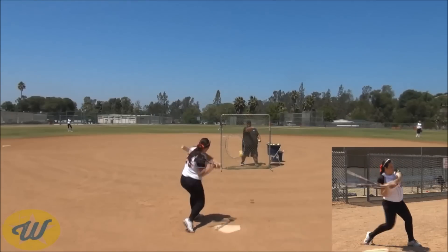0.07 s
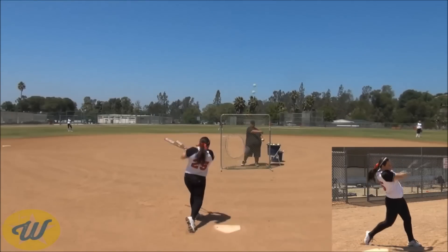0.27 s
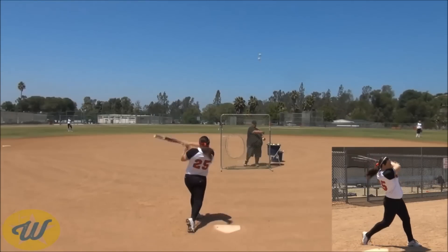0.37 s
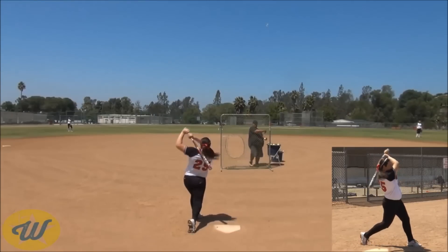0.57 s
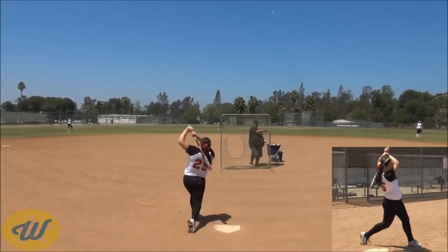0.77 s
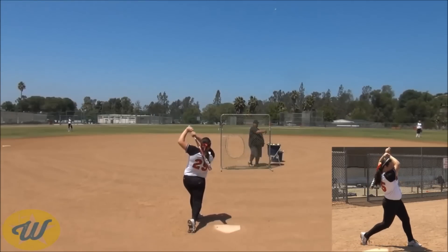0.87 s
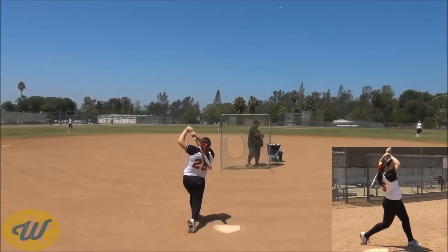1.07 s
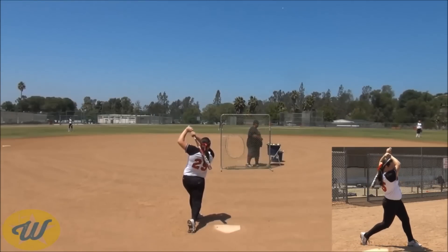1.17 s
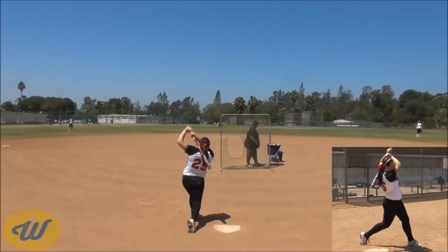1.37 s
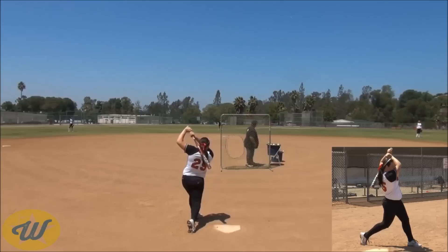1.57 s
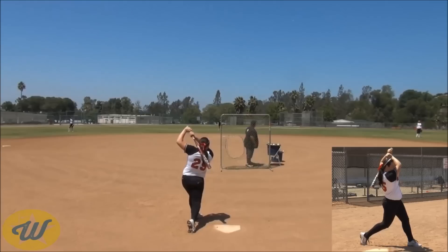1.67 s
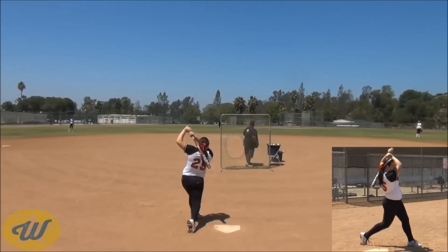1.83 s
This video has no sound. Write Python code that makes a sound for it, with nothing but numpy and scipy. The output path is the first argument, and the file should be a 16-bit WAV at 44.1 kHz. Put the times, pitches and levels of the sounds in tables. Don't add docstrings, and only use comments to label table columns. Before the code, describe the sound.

A bat cracks a softball once, sharp and overloaded, with echoes across an open field

```python
import sys
import numpy as np
from scipy import signal
from scipy.fft import rfft, irfft
from scipy.io import wavfile
from scipy.ndimage import uniform_filter1d

SR = 44100
rng = np.random.default_rng(int(sys.argv[2]) if len(sys.argv) > 2 else 0)


def field_ratio(decibels):
    return 10 ** (np.asarray(decibels, dtype=float) / 20)


def transcribe(signal):
    frames = np.atleast_2d(signal).T
    limited = np.clip(frames, -1, 1)
    pcm = np.round(limited * 32767).astype(np.int16)
    wavfile.write(sys.argv[1], SR, pcm)


N = 83790
HIT_S = 0.23717


def bat():
    # pitch_hz, level_db, t60_s
    modes_left = [(756, -12.8, .027), (1044, 19.9, .004), (1627, 26.1, .0023), (2279, 22.1, .0029),
                  (3448, 13.3, .002), (3420, -17, .015), (3790, -14, .016), (5630, -24, .006),
                  (9250, -14, .005)]
    # pitch_hz, level_db, t60_s
    modes_right = [(700, -14, .035), (960, 4.9, .0068), (1433, 14.7, .0027), (2085, 2.7, .0047),
                   (4137, -2.5, .0023), (6666, 5.5, .0016), (7600, 10.5, .0017), (8118, 4.9, .002)]
    # delay_s, gain (linear)
    bounces_left = [
        (.001435, .41),
        (.00538, .045),
    ]
    # delay_s, gain (linear)
    bounces_right = [
        (.00139, .14),
        (.0032, .025),
    ]
    right_lag_s = 0.0002
    right_hit_s = HIT_S + right_lag_s
    out, t = np.zeros((2, N)), np.arange(3000) / SR

    crack_left = -struck(modes_left, bounces_left, 0)
    crack_right = struck(modes_right, bounces_right, right_lag_s)
    add(out, HIT_S, np.array([crack_left, crack_right]))

    touch = decay(t, -14, 0.0006) * np.sin(2 * np.pi * 4360 * t)
    add(out[0], HIT_S - 0.00028, touch)
    add(out[1], right_hit_s - 0.0001, -field_ratio(-22.5) * touch)
    ping = decay(t, 0, 0.0022) * np.sin(2 * np.pi * 11000 * t)
    add(out[1], right_hit_s - 0.00002, -ping)

    noise = bright(rng.standard_normal((2, len(t))), 600)
    rattle = evened(dull(noise, 3900) + 0.074 * noise) * decay(t, -16, 0.032)
    onset = np.minimum(t / 0.0006, 1)
    add(out, HIT_S + 0.0026, onset * rattle * field_ratio([[0], [-12]]))
    fizz_fade = np.sqrt(np.clip(1 - t / 0.0105, 0, 1))
    add(out, HIT_S + 0.001, field_ratio(-30) * evened(bright(noise, 6500)) * fizz_fade)
    thump = np.hanning(round(0.0034 * SR))
    add(out[0], HIT_S + 0.0018, -field_ratio(-25) * thump)
    return out


def struck(modes, bounces, lag_s):
    contact_s = 0.0006
    out = 0
    for delay_s, gain in [(0.000015, 0.72)] + bounces:
        t = np.maximum(np.arange(3000) / SR - lag_s - delay_s, 0)
        ring = sum(decay(t, db, t60) * np.sin(2 * np.pi * hz * t) for hz, db, t60 in modes)
        out = out + gain * ring * np.minimum(t / contact_s, 1)
    return out


def echoes():
    # start_s, peak_db, colour_hz, edge_db (bright edge)
    returns = [(0.258, -36, 869.2, -49), (0.263, -27.5, 756, -50), (0.276, -30, 1170, -39),
               (0.3, -38, 1070, -56), (0.336, -44, 1900, -44), (0.3435, -30.5, 2340, -58),
               (0.3551, -26, 1000, -52), (0.363, -38, 2700, -60), (0.3865, -31, 2170, -47),
               (0.4211, -30, 2100, -44.5), (0.451, -34, 2360, -47), (0.4531, -29, 2620, -47),
               (0.4595, -33, 2200, -58), (0.5165, -35, 1900, -52), (0.5185, -34, 915, -58),
               (0.571, -35.5, 1945, -60), (0.593, -37, 1820, -55), (0.623, -31.5, 1670, -58)]
    return pocks(returns)


def field():
    # pitch_hz, t60_s
    far_decay = [(300, 0.17), (700, 0.37), (1500, 0.66), (3000, 1), (6000, 0.92), (12000, 0.87)]
    # pitch_hz, level_db (per Hz)
    scatter_tone = [(180, -71), (300, -40), (484, -10), (1070, 4), (1350, -6.5), (2790, -6.5),
                    (4280, -18.5), (11700, -32), (15500, -49)]
    x = coloured(rng.standard_normal((2, N)), scatter_tone)
    hz, t, bands = signal.stft(x, SR, nperseg=256)
    band_t60 = read(far_decay, hz)[:, None]
    far = signal.istft(bands * decay(t, 0, band_t60), SR, nperseg=256)[1][:, :N]
    near = x[::-1, ::-1] * decay(np.arange(N) / SR, -33.5, 0.23)
    out = np.zeros((2, N))
    add(out, HIT_S + 0.008, paired(near + field_ratio(-35.5) * far, -0.03, -3))
    return out


def cleats():
    # time_s, level_db
    scrape = [(0, -50), (.05, -47.5), (.11, -49.5), (.15, -46.5), (.21, -50.5), (.35, -49.5), (.45, -47),
              (.5, -49), (.53, -50), (.63, -52.5), (.67, -57.5), (1.1, -60), (1.18, -62), (1.33, -59.5),
              (1.39, -54.5), (1.49, -50.5), (1.56, -59.5), (1.84, -61.5), (1.9, -51.5)]
    # pitch_hz, level_db (per Hz)
    dirt = [(240, -26), (400, -7), (442, -6), (613, -6.5), (887, -4.5), (3430, -12), (6510, -27.5),
            (12000, -41.5), (15600, -57), (22000, -120)]
    grains_per_s, spread_db = 2500, 2.5
    size = field_ratio(spread_db * np.minimum(rng.exponential(1, (2, N)), 4))
    falls = rng.random((2, N)) < grains_per_s / SR
    grit = size * falls * rng.choice([-1., 1.], (2, N))
    x = coloured(grit / grit.std() + 0.52 * rng.standard_normal((2, N)), dirt)
    return 1.51 * level(scrape) * paired(x, 0.0418, -7.5)


def stones():
    # start_s, peak_db, colour_hz, edge_db (bright edge)
    crushed = [(0.0232, -38.5, 1840, -56), (0.1425, -37, 2520, -51), (0.866, -53, 2600, -57),
               (1.39, -45, 1500, -66), (1.417, -46, 1200, -66), (1.436, -38.5, 1400, -64),
               (1.467, -41, 1500, -73), (1.485, -45, 1390, -70), (1.491, -38.5, 1700, -68),
               (1.503, -43, 1300, -69), (1.516, -47, 1250, -68)]
    return pocks(crushed)


def spray():
    # time_s, level_db
    thrown = [(.12, -77), (.15, -64), (.2, -66), (.253, -69), (.262, -48), (.3, -51), (.36, -54.5),
              (.41, -59.5), (.455, -54), (.49, -64), (.52, -63), (.7, -78)]
    # pitch_hz, level_db (per Hz)
    dust = [(1760, -33), (3000, -2), (3130, -18), (4750, -14), (7590, -10), (12100, -17.5), (15500, -31)]
    return level(thrown) * paired(coloured(rng.standard_normal((2, N)), dust), 0, -1.1)


def bird():
    # start_s, length_s, first_hz, last_hz, level_db
    notes = [(0, 0.045, 3093, 3014, -58.5), (0.403, 0.036, 3450, 3330, -68),
             (0.596, 0.02815, 3469, 3430, -70), (0.614, 0.03, 3030, 3080, -62.5),
             (0.683, 0.044, 3030, 3060, -61), (0.729, 0.024, 2490, 2540, -62.5),
             (0.748, 0.022, 2980, 3090, -57.5), (0.762, 0.04, 3170, 3210, -57),
             (0.809, 0.056, 3180, 3190, -61), (0.883, 0.028, 3230, 3210, -62.5),
             (0.942, 0.022656, 2941, 2748, -64.5), (0.961, 0.027, 2450, 2530, -66),
             (0.999, 0.069, 3200, 3237, -68),
             (1.214, 0.023, 2620, 2480, -66.5), (1.236, 0.059, 3050, 3765, -61.5),
              (1.286, 0.017, 3362, 3149, -60), (1.289, 0.03378, 3507, 3700, -63),
              (1.316, 0.0112, 3034, 3176, -64), (1.331, 0.03232, 3500, 3568, -66),
              (1.366, 0.015, 3133, 3170, -62), (1.405, 0.028, 3060, 3100, -59.5),
              (1.459, 0.063, 3186, 2990, -63), (1.526, 0.042, 3050, 3090, -62),
              (1.651, 0.046, 4070, 3970, -65.5), (1.665, 0.028, 3350, 3650, -69),
              (1.7, 0.05, 3420, 3800, -73.5), (1.744, 0.083, 3730, 3220, -70.5),
              (1.373, 0.02963, 3590, 3610, -65), (1.439, 0.04, 3560, 3240, -63),
              (1.838, 0.043, 2870, 2974, -66)]
    warble_hz, warble_db = 30, 2.4
    out = np.zeros(N)
    for s, length, first_hz, last_hz, db in notes:
        u = np.arange(0, length, 1 / SR) / length
        wobble = evened(dull(rng.standard_normal((2, len(u) + 500)), 120)[:, 500:])
        slur_hz = first_hz + (last_hz - first_hz) * np.sin(u * np.pi / 2)
        phase = 2 * np.pi * np.cumsum(slur_hz + warble_hz * wobble[0]) / SR
        tone = np.sin(phase) + field_ratio(-19) * np.sin(2 * phase)
        swell = np.sin(np.pi * u) ** 0.4
        add(out, s, 2 * field_ratio(db + warble_db * wobble[1]) * swell * tone)
    blur = rng.standard_normal((2, 6000)) * decay(np.arange(6000) / SR, 0, 0.18)
    wet = signal.fftconvolve(out[None], blur / np.linalg.norm(blur[0]), axes=1)[:, :N]
    return (out + field_ratio(-3.5) * wet) * field_ratio([[0], [-9]])


def wind():
    # time_s, level_db
    gusts = [(0, -46.5), (.18, -43.5), (.21, -38.5), (.235, -36.5), (.27, -62), (.38, -51.5), (.5, -48),
             (.68, -44), (.85, -42), (1, -45.5), (1.13, -42), (1.2, -45), (1.36, -42), (1.5, -45.5),
             (1.63, -46), (1.7, -45), (1.8, -43.5), (1.9, -44.5)]
    # pitch_hz, level_db (per Hz)
    rumble = [(12, -38), (20, -16), (81, 0.5), (140, -6.5), (262, -12.5), (333, -23.5), (364, -14),
              (386, -26.5), (700, -30.5), (910, -58), (1540, -120)]
    lumps = evened(uniform_filter1d(uniform_filter1d(rng.standard_normal(N), 1200), 1200))
    x = coloured(rng.standard_normal((2, N)), rumble)
    return 1.92 * level(gusts) * field_ratio(0.5 * lumps) * paired(x, -0.7, -15)


def hiss():
    # pitch_hz, level_db (per Hz)
    hiss_tone = [(120, -44), (200, -5.5), (273, -5.5), (548, -16.5), (612, -19), (1060, -8), (1140, -15),
                 (3130, -26.5), (16000, -37)]
    return field_ratio(-57) * paired(coloured(rng.standard_normal((2, N)), hiss_tone), 0, -0.5)


def pocks(events):
    cycles = 2.86
    edge_band = signal.butter(1, [3000, 8000], "band", fs=SR)
    out, t = np.zeros((2, N)), np.arange(900) / SR
    for s, db, hz, edge_db in events:
        u = t * hz / cycles * 4
        pock = np.e * u * np.exp(-u) * np.sin(2 * np.pi * hz * t)
        noise = rng.standard_normal((2, len(t)))
        tick = decay(t, -7, 0.012) * dull(noise, 3500)
        edge = decay(t, edge_db, 0.0178) * signal.lfilter(*edge_band, noise)
        body = field_ratio(db) * (pock * [[1.6], [-field_ratio(-17)]] + tick)
        add(out, s, body + 2 * edge * field_ratio([[0], [-4.5]]))
    return out


def decay(t, db, t60):
    return field_ratio(db - 60 * t / t60)


def dull(x, hz):
    return signal.lfilter(*signal.butter(2, hz, fs=SR), x)


def bright(x, hz):
    return signal.lfilter(*signal.butter(2, hz, "high", fs=SR), x)


def evened(x):
    return x / np.sqrt(np.mean(x ** 2) + 1e-20)


def read(points, hz):
    f, value = np.transpose(points)
    return np.interp(np.log(hz + 1), np.log(f + 1), value)


def level(curve):
    s, db = np.transpose(curve)
    return field_ratio(np.interp(np.arange(N) / SR, s, db))


def add(mix, s, sound):
    part = mix[..., round(s * SR):][..., :sound.shape[-1]]
    part += sound[..., :part.shape[-1]]


def coloured(x, points):
    y = irfft(rfft(x) * field_ratio(read(points, np.fft.rfftfreq(N, 1 / SR))), N)
    return y / np.sqrt(np.mean(y[0] ** 2))


def paired(x, same, right_db):
    right = same * x[0] + np.sqrt(1 - same ** 2) * x[1]
    return np.array([x[0], field_ratio(right_db) * right])


def scene():
    struck_ball = bat() + echoes() + field()
    feet = cleats() + stones() + spray()
    return struck_ball + feet + bird() + wind() + hiss()


def roll_off(x):
    return signal.sosfilt(signal.butter(12, 16670, fs=SR, output="sos"), x)


def record(dry):
    clip, sag_depth, sag_s, rebound_s = 0.84, 0.12, 0.041, 0.27
    t = np.maximum(np.arange(N) / SR - HIT_S, 0)
    sag = np.minimum(t / 0.003, 1) * (np.exp(-t / sag_s) - 0.15 * np.exp(-t / rebound_s))
    x = np.clip(dry, -clip, clip) - sag_depth * sag
    x = signal.oaconvolve(x, signal.firwin(255, 15900, fs=SR)[None], "same")
    return roll_off(x)


dry = scene()
out = record(dry)
transcribe(out)
```